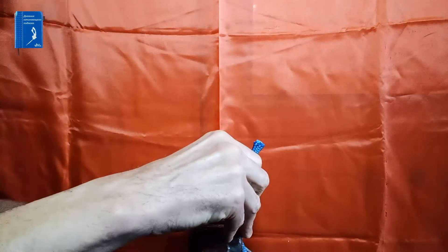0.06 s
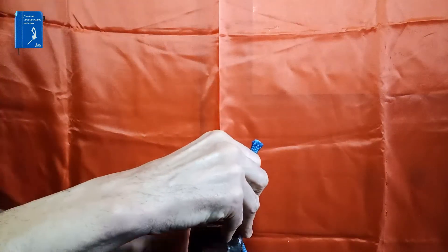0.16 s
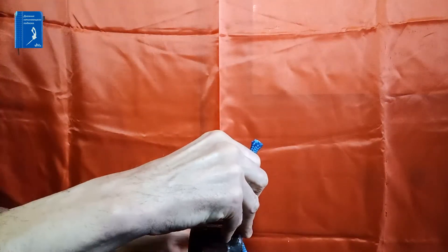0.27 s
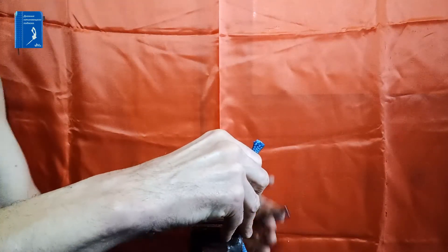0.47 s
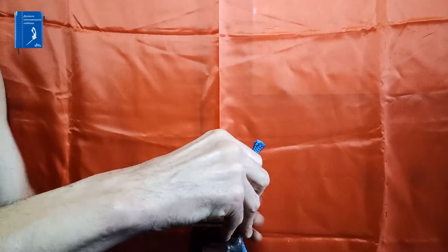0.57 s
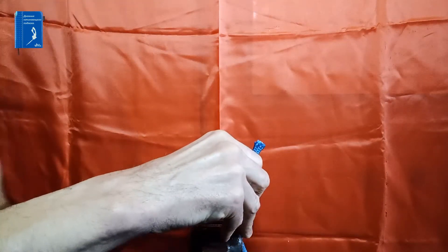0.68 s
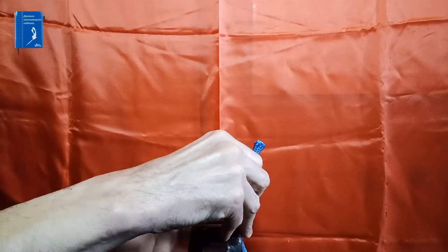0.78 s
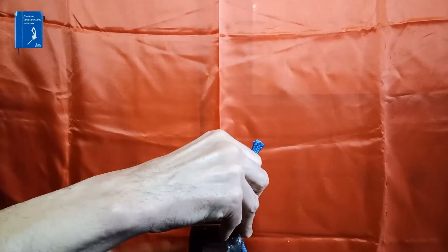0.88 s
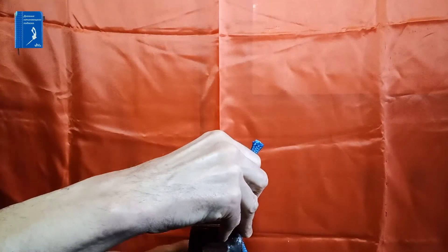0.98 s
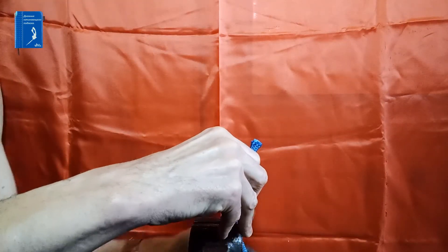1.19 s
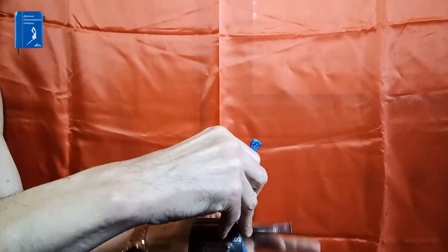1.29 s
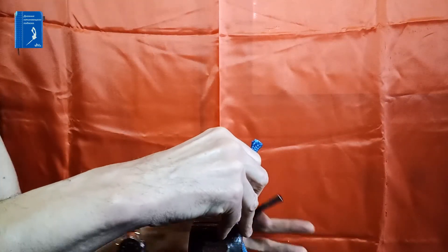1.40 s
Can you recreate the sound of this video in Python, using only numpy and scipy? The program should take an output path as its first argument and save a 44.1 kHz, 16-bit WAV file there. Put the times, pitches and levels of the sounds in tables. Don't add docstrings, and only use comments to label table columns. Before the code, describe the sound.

A small metal vise: its handle bar scrapes with soft taps, drops with a bright hard clank and bounces, knocks again more quietly, then faint rubbing in a small damped room, close phone microphone.

```python
import sys
import numpy as np
from scipy import signal
from scipy.fft import rfft, irfft
from scipy.io import wavfile
from scipy.ndimage import map_coordinates

SR = 44100
rng = np.random.default_rng(int(sys.argv[2]) if len(sys.argv) > 2 else 0)


def persist_wave(psi):
    counts = np.round(np.clip(psi, -1, 1) * 32767).astype(np.int16)
    wavfile.write(sys.argv[1], SR, np.atleast_2d(counts).T)


def volts_from_decibels(level):
    exponent = np.asarray(level, float) / 20
    return 10 ** exponent


N = 63945
BAR_RISE_S = 0.001


def band(x, centre_hz, width_hz):
    return signal.lfilter(*signal.iirpeak(centre_hz, centre_hz / width_hz, fs=SR), x)


def unit(x):
    return x / np.sqrt(np.mean(x ** 2))


def resonance(x, centre_hz, width_hz):
    return unit(band(band(x, centre_hz, width_hz), centre_hz, width_hz))


def colour(x, points):
    hz = np.maximum(np.fft.rfftfreq(len(x), 1 / SR), 1)
    point_hz, point_db = np.array(points).T
    gain_db = np.interp(np.log(hz), np.log(point_hz), point_db)
    return irfft(rfft(x) * volts_from_decibels(gain_db), len(x))


def walk(rate_hz):
    return map_coordinates(rng.standard_normal(64), [np.arange(N) * rate_hz / SR], order=3)


def curve(points, col=1):
    points = np.array(points)
    return volts_from_decibels(np.interp(np.arange(N) / SR, points[:, 0], points[:, col]))


def decay(t, t60_s):
    return np.exp(-np.log(1000) * t / t60_s)


def ring(out, start_s, level_db, modes, rise_s, varied=False):
    hz, mode_db, t60_s = np.array(modes).T[:, :, None]
    level_dev, pitch_dev, phase_dev = rng.standard_normal((3, len(modes), 1)) * varied
    first = max(int(start_s * SR) + 1, 0)
    last = min(first + int(0.93 * t60_s.max() * SR), N)
    t = np.arange(first, last) / SR - start_s
    gain = volts_from_decibels(level_db + mode_db + 2.0 * level_dev)
    tone = np.sin(2 * np.pi * hz * (1 + 0.0046 * pitch_dev) * t + 2 * phase_dev)
    push = 1 - np.exp(-(t / rise_s) ** 2)
    out[first:first + len(t)] += push * np.sum(gain * decay(t, t60_s) * tone, axis=0)


def air():
    # pitch_hz, level_db (per Hz)
    hush_points = [(15, -44), (25, -13), (82, 0.5), (181, -11), (331, 1.5), (442, -8.5), (1220, -10.5),
                   (1340, -10.5), (8000, -33.5), (10400, -63.5), (17600, -120)]
    # pitch_hz, width_hz, level_db
    hum_bands = [(90, 60, -67), (283, 150, -71)]
    out = volts_from_decibels(-66.5 + walk(5.6)) * unit(colour(rng.standard_normal(N), hush_points))
    for hz, width_hz, db in hum_bands:
        out += volts_from_decibels(db + 1.4 * walk(17)) * unit(band(rng.standard_normal(N), hz, width_hz))
    return out


def rub():
    # start_s, level_db
    effort = [(0, -68), (.56, -70.5), (.61, -67.5), (.65, -70.5), (.71, -65), (.76, -69), (.82, -67.5),
              (.86, -63), (.92, -63.5), (.95, -66), (1.0, -67), (1.07, -71.5), (1.1, -78), (1.2, -72.5),
              (1.28, -73.5), (1.38, -69.5), (1.45, -75)]
    # pitch_hz, width_hz, level_db
    resonances = [(1080, 280, -2.5), (1830, 80, -9.5), (2680, 110, -13), (4260, 130, -13),
                  (4470, 70, -13.5), (1309, 70, -10.5), (7300, 140, -20), (348.5, 67, -2.5)]
    out = np.zeros(N)
    for hz, width_hz, db in resonances:
        flicker_db = 6 * walk(10)
        out += volts_from_decibels(db + flicker_db) * resonance(rng.standard_normal(N), hz, 2 * width_hz)
    return curve(effort) * out


def bumps():
    # start_s, level_db, pitch_hz, t60_s
    events = [
        (0.058, -58, 83, 0.17),
        (.14, -45, 106, 0.098),
        (.685, -52, 100.3, 0.22),
        (0.801, -58, 85.3, .15),
        (.905, -55, 85, .12),
        (1.029, -48, 116.5, 0.14),
    ]
    out = np.zeros(N)
    for start_s, db, hz, t60_s in events:
        ring(out, start_s, db, [(hz, 0, t60_s)], rise_s=0.012)
    return out


def taps():
    # start_s, level_db, pitch_hz, t60_s
    events = [
        (.0081, -39, 1000, .03),
        (0.0722, -43, 1100, .03),
        (0.0964, -35.5, 1100, .05),
        (0.1153, -17.5, 930, .03),
        (.1155, -24.5, 1100, .03),
        (.1160, -35.5, 1500, 0.024),
        (0.1356, -37, 1050, .03),
        (0.148, -39, 1100, .05),
        (.1601, -35, 1120, .04),
        (0.1724, -28, 1080, .04),
    ]
    out = np.zeros(N)
    for start_s, db, hz, t60_s in events:
        ring(out, start_s, db, [(hz, 0, t60_s)], rise_s=0.0035)
    return out


def slide():
    # start_s, level_db, squeal_db (relative)
    motion = [(0, -45.5, -9), (.03, -58, -14.5), (.09, -58, -15), (.11, -61, -10), (.14, -50, -6.5),
              (.17, -47, 0), (.2, -48, 3.5), (.226, -49, 2.5), (.24, -69.5, 0), (1.45, -89, 0)]
    # pitch_hz, width_hz, level_db
    resonances = [(1090, 270, 2.5), (2620, 1200, -17), (390, 300, -11.5), (5070, 340, -19.5)]
    rate_hz, spread_db = 3000, 2.0
    timing, sign, size = rng.random((3, N))
    clicks = (timing < rate_hz / SR) * np.sign(sign - 0.5) * volts_from_decibels(-spread_db * np.log(size + 1e-9))
    body = sum(volts_from_decibels(db) * resonance(clicks, hz, width_hz) for hz, width_hz, db in resonances)
    squeal = resonance(clicks, 1800, 420)
    squeal += volts_from_decibels(-14.5) * resonance(clicks, 5000, 1200)
    squeal += volts_from_decibels(-32) * resonance(clicks, 7800, 300)
    return curve(motion) * (body + curve(motion, col=2) * squeal)


def crack(power):
    # pitch_hz, level_db
    spectrum = [(150, -34.5), (700, -29), (1100, -14.5), (2300, -4), (3800, 0.5), (5100, 1.5),
                (6200, -10.5), (8000, -13)]
    crack_db, crack_s, rattle_db, rattle_t60_s = -9.5, 0.0028, -24.5, 0.15
    t = np.arange(SR // 3) / SR
    fade = volts_from_decibels(2 * crack_db) * np.exp(-2 * t / crack_s) + volts_from_decibels(2 * rattle_db) * decay(2 * t, rattle_t60_s)
    shape = (1 - np.exp(-t / BAR_RISE_S)) * fade
    envelope = np.sqrt(np.abs(signal.fftconvolve(power, shape)[:N]))
    return envelope * unit(colour(rng.standard_normal(N), spectrum))


def knocks():
    # start_s, bar_db, jaw_db, bench_db; the first row, just before 0 s, is a ring already under
    hits = [(-.002, -61.5, -32, -44), (.1572, -39.5, -66, -68), (0.1728, -36.5, -69, -71.5),
            (.1902, -38, -59, -70.5), (0.2283, -30, -31, -61), (.2386, -31, -10.5, -45),
            (.2426, -39, -14, -33), (0.2494, -19, -20, -41.5), (0.254, -38, -19.5, -57),
            (0.2579, -27.5, -27, -42), (.2651, -22, -34, -51.5), (.2721, -19.5, -38.5, -56.5),
            (0.4257, -59, -42, -77.5), (.4290, -29.5, -26, -49.5), (0.4353, -26, -23, -44.5),
            (.4400, -27.5, -30, -44), (0.4432, -34, -24, -42.5), (.4466, -37.5, -30, -55),
            (0.4505, -36, -42, -52), (0.9742, -64.5, -63.5, -55)]
    # pitch_hz, level_db, t60_s
    bar = [(5184, -1.5, 0.017), (4970, -0.5, .016), (5350, -4, 0.015), (5083, -31, 0.33), (5240, -33, .16),
           (5140, -30, .14), (5070, -31, .14), (4780, -10, .02), (3730, -13.5, .02), (7810, -19.5, 0.007)]
    # pitch_hz, level_db, t60_s
    jaw = [(923, -5, .028), (1000, -5.5, 0.02), (1076.6, -1.5, 0.029), (1138.3, -11.5, 0.11),
           (1305, -5, 0.029), (1500, -8, .02), (1633, -10.5, 0.033), (1864.6, -17, .08), (2189, -6, 0.02),
           (2264, -10, 0.015), (2790, -17.5, 0.0074)]
    # pitch_hz, level_db, t60_s
    bench = [(229, -4, .07), (303.6, -7.5, 0.13), (384, -6, 0.053), (428, -8, 0.11), (346.4, -9, 0.061)]
    # pitch_hz, level_db, t60_s
    drop_modes = [(5130, 6.3, .02), (4850, -10, .014), (5400, -12, .014)]
    # pitch_hz, level_db, t60_s
    tick_modes = [(1620, -52, .09), (1860, -47, .04), (1090, -53, .025), (740, -58, .025),
                  (2300, -56, .012), (5600, -59, .008), (4300, -60, .01)]
    drop_s = 0.2326
    drop = (drop_s, -3.5, -8.5, -21.5)
    out, power = np.zeros(N), np.zeros(N)
    ring(out, 0.9735, 0, tick_modes, BAR_RISE_S)
    ring(out, drop_s, 0, drop_modes, rise_s=0.0011)
    for start_s, bar_db, jaw_db, bench_db in [drop] + list(hits):
        bar_cut_db = 12 if start_s == drop_s else 0
        ring(out, start_s, bar_db - bar_cut_db, bar, BAR_RISE_S, varied=True)
        ring(out, start_s, jaw_db, jaw, rise_s=0.0008, varied=True)
        ring(out, start_s, bench_db, bench, rise_s=0.004, varied=True)
        power[max(int(start_s * SR), 0)] += volts_from_decibels(2 * bar_db) + volts_from_decibels(2 * (jaw_db - 3))
    return out + crack(power)


def room(x):
    # pitch_hz, t60_s, level_db
    tail_bands = [(300, 0.21, 0), (1100, 0.12, -5.5), (2500, 0.18, 2), (3720, 0.2125, -3.5),
                  (5000, 0.093, -8), (7500, .15, -6.5)]
    tail_db, gap_s = -11, 0.004
    t = np.arange(SR // 2) / SR
    tail = np.zeros(len(t))
    for hz, t60_s, db in tail_bands:
        tail += volts_from_decibels(db) * unit(band(rng.standard_normal(len(t)), hz, 0.99 * hz)) * decay(t, t60_s)
    tail *= 1 - np.exp(-(t / gap_s) ** 2)
    return volts_from_decibels(tail_db) * signal.fftconvolve(x, tail / np.sqrt(np.sum(tail ** 2)))[:N]


def scene():
    vise = bumps() + taps() + slide() + knocks()
    return (air() + rub() + vise + room(vise))[None]


def band_limit(x):
    return signal.sosfilt(signal.butter(12, 16270, fs=SR, output="sos"), x)


def record(dry):
    band_hz, low_hz, top_hz, hiss_db = 7900, 25, 16200, -92.5
    x = signal.sosfiltfilt(signal.ellip(8, 0.2, 50, band_hz, fs=SR, output="sos"), dry)
    x = signal.lfilter(*signal.butter(1, low_hz, "high", fs=SR), x)
    x = np.clip(x, -1, 1) + volts_from_decibels(hiss_db) * rng.standard_normal(dry.shape)
    x = signal.sosfiltfilt(signal.ellip(6, 0.1, 25, top_hz, fs=SR, output="sos"), x)
    return band_limit(x)


dry = scene()
out = record(dry)
persist_wave(out)
```